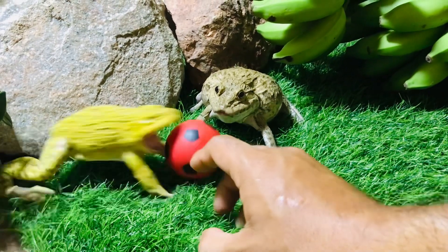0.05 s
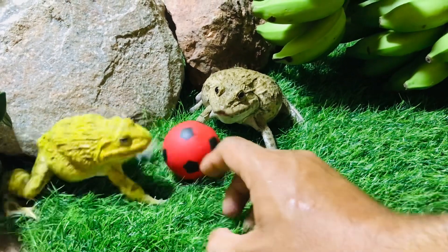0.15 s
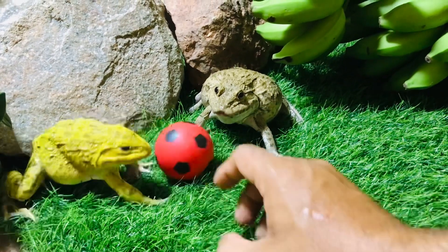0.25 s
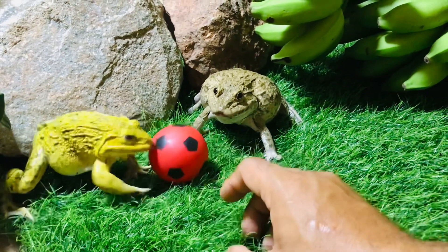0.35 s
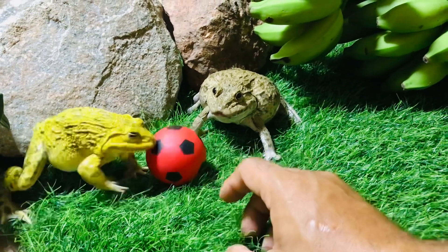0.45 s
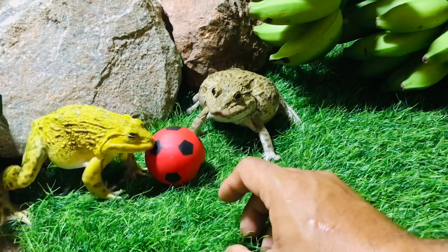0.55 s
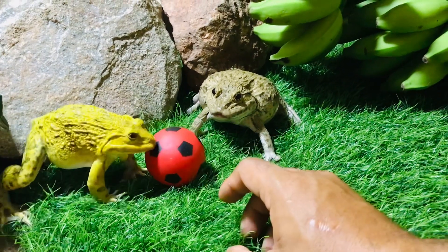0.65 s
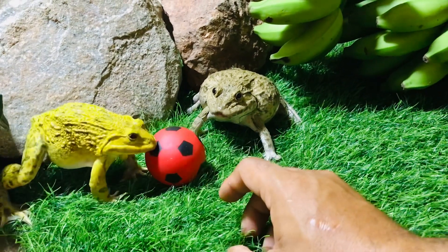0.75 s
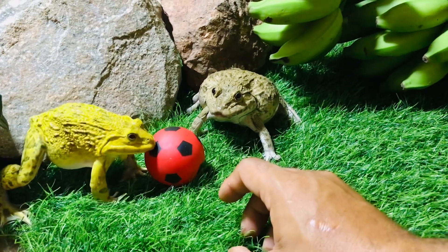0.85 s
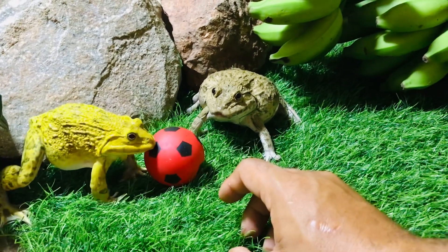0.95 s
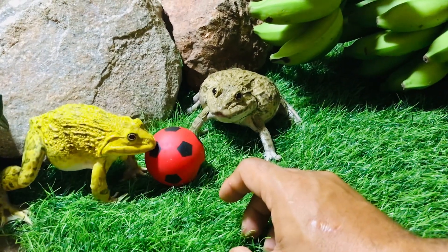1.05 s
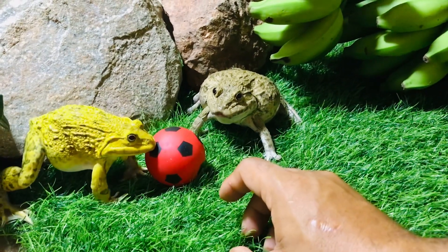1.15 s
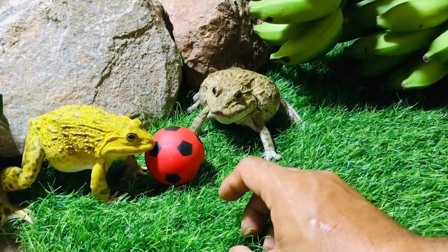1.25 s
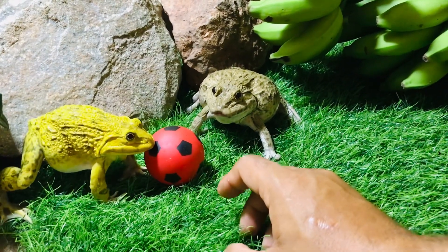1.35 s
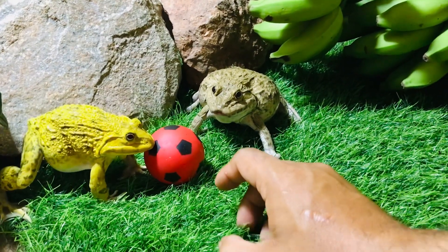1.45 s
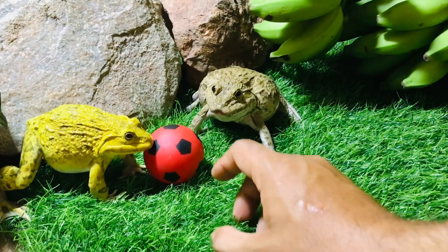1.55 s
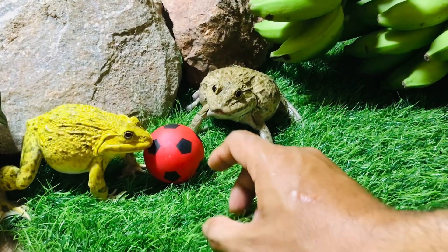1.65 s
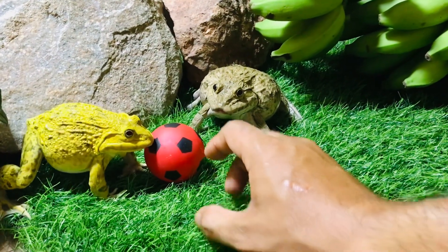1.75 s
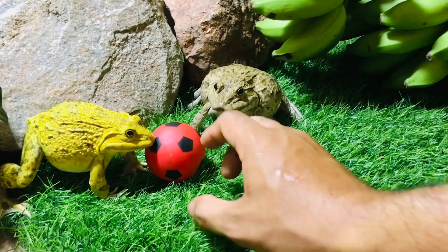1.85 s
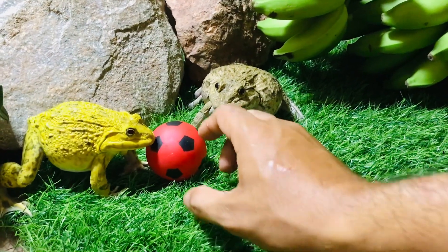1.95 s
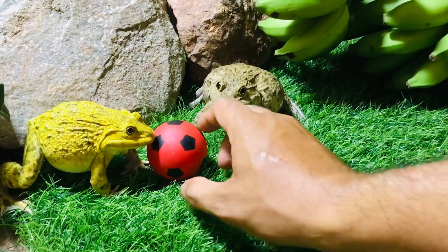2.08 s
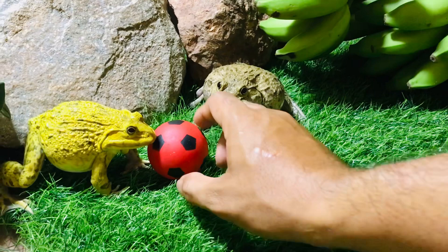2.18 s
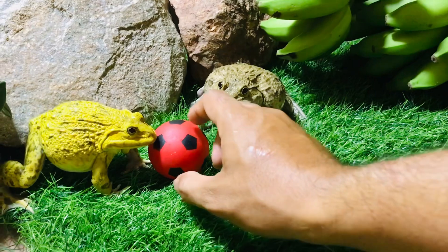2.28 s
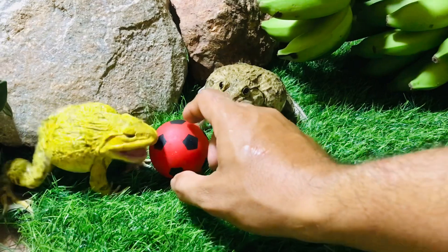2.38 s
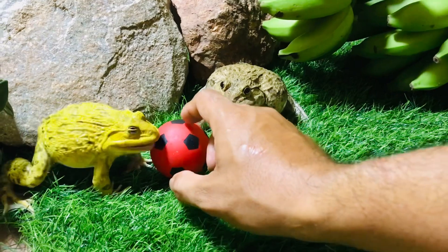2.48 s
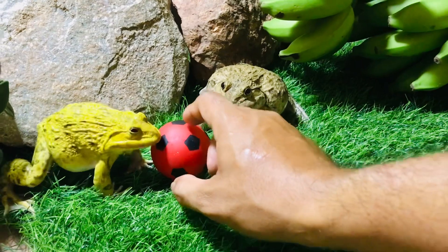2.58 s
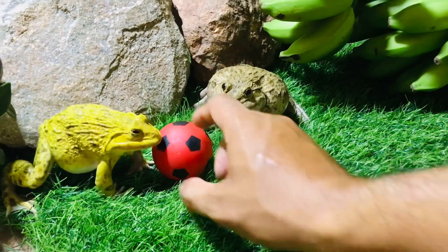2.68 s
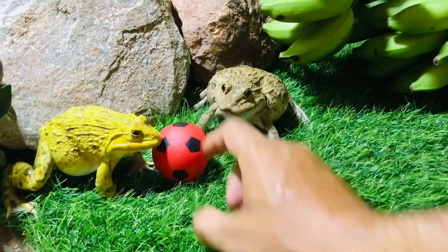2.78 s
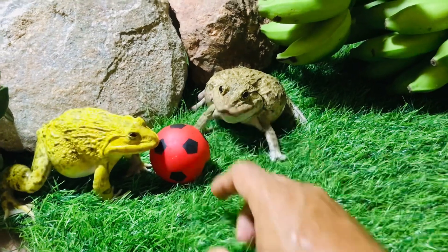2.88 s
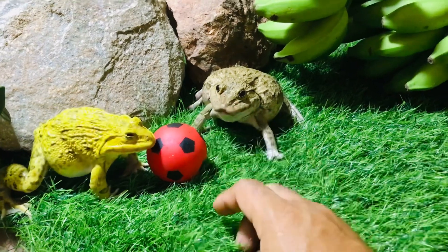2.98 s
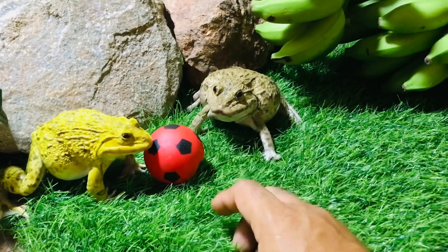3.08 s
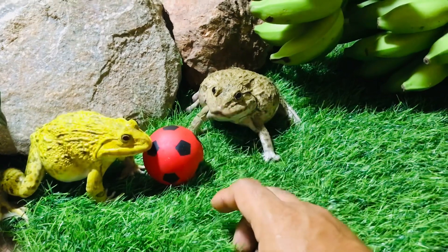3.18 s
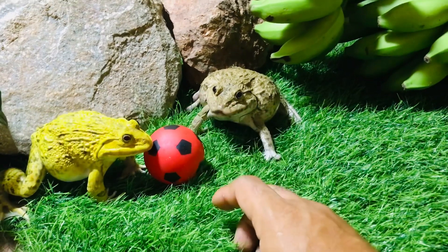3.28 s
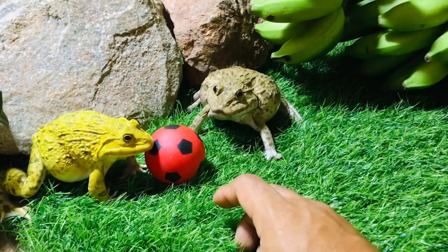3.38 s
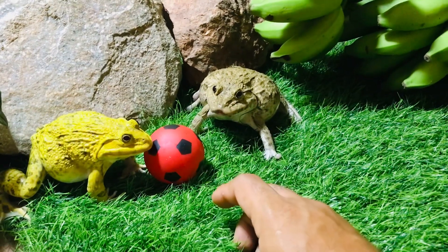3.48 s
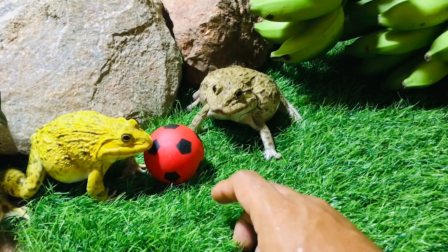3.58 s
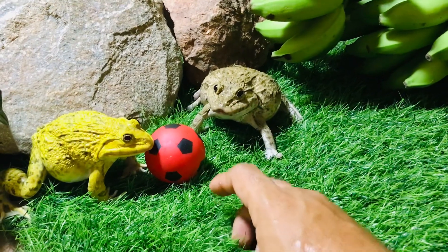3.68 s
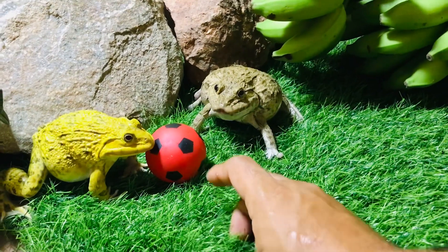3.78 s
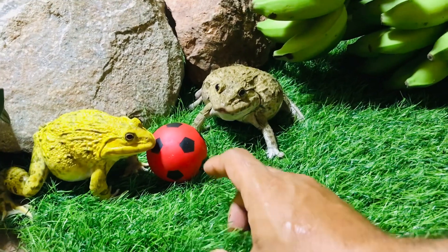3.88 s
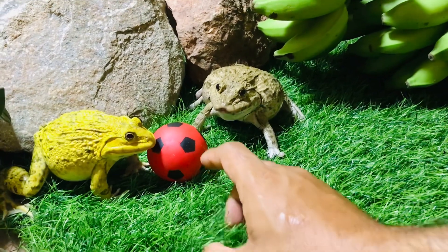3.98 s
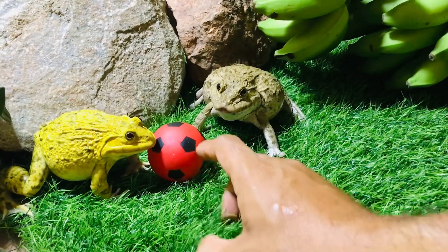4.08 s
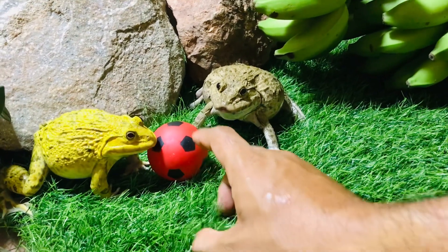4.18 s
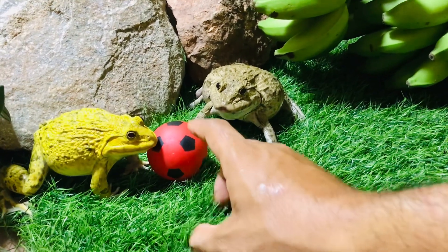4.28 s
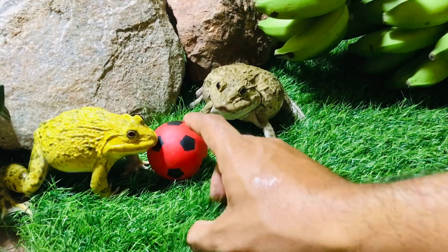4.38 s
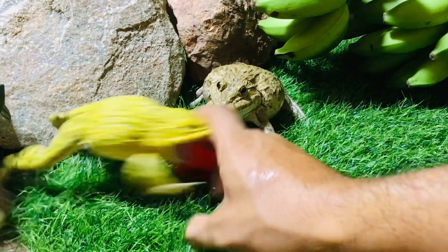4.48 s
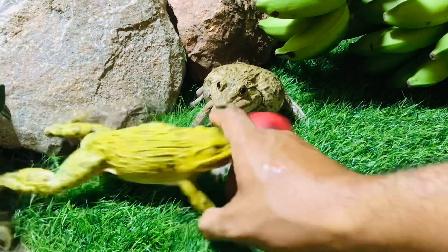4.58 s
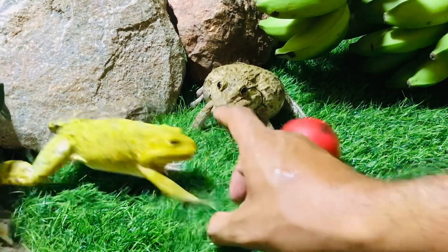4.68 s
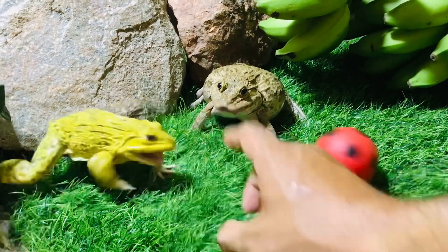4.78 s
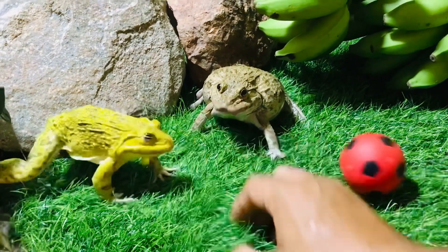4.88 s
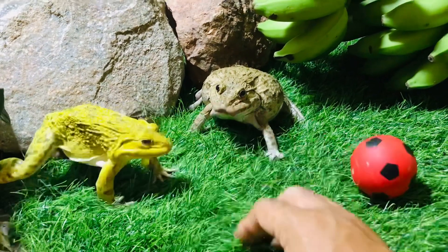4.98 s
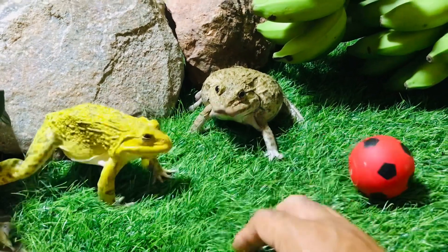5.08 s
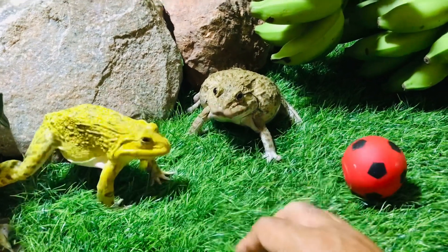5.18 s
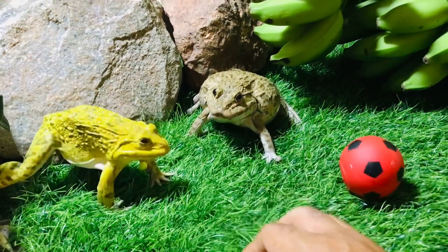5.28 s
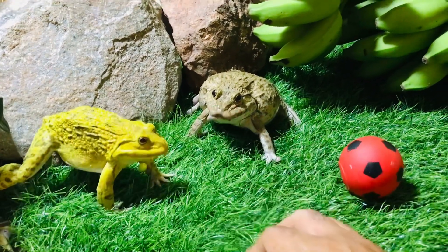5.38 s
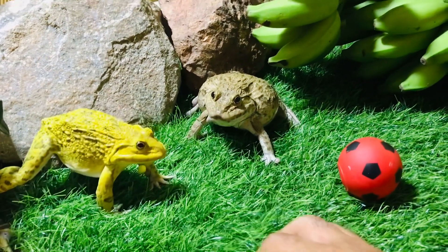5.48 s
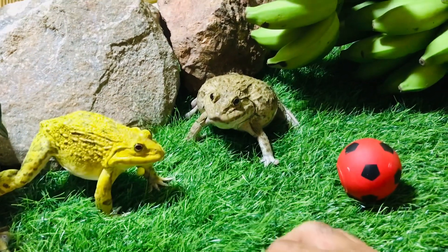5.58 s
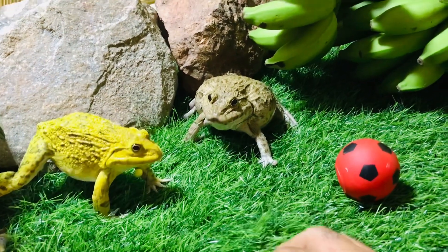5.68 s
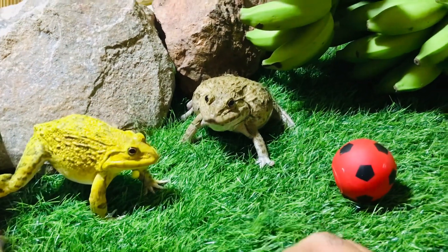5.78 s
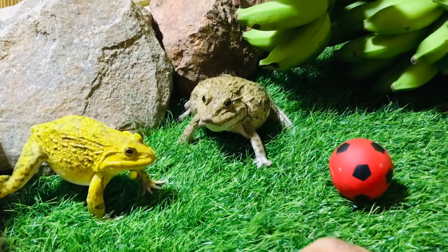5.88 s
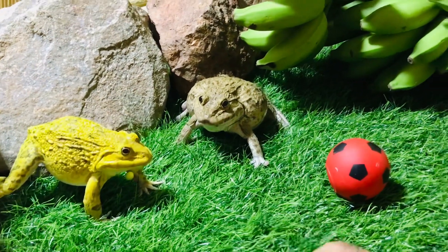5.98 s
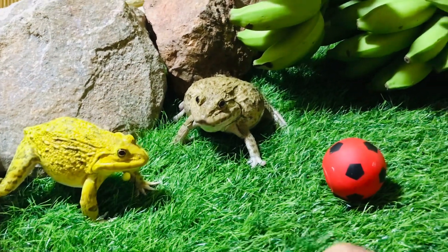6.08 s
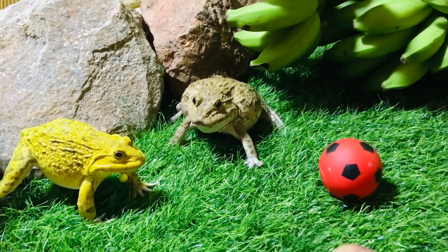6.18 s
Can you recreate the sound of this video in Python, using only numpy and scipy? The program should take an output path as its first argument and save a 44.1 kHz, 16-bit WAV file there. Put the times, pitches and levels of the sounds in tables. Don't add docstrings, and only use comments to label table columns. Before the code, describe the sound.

At 0 s the echo of a squeak already finished fades away within half a second, leaving a low machine drone at two deep pitches, a far rumble and a steady soft outdoor hiss; the hum swells and eases unevenly throughout. At about 2.35 s a small rubber squeaker close to the phone gives a bright, loud, high squeak lasting roughly 0.12 s, arching up then down, with a breathy puff at its opening and a rough splutter as it chokes. Its tail rings off hard walls for half a second. Background alone follows. Very faint grass rustling begins near 4.25 s, then a slightly duller squeak at 4.46 s with a sharper opening whistle, a brief rubber scrape near 4.7 s, and a last dull-starting squeak at 4.73 s, choking longer. The echo dies, and hum and hiss continue to the end, around 6 s.

```python
import sys
import numpy as np
from scipy import signal
from scipy.fft import rfft, irfft
from scipy.io import wavfile
from scipy.ndimage import uniform_filter1d, minimum_filter1d

SR = 44100
rng = np.random.default_rng(int(sys.argv[2]) if len(sys.argv) > 2 else 0)


def generate_wav(signal):
    frames = np.transpose(np.atleast_2d(signal))
    scaled = np.clip(frames, -1, 1) * 32767
    pcm = np.round(scaled).astype(np.int16)
    wavfile.write(sys.argv[1], SR, pcm)


def gain_from_decibels(decibels):
    exponent = np.asarray(decibels, float) / 20
    return 10 ** exponent


N = 275357
LEAD = SR // 4


def shaped(points, count, bands=()):
    hz, db = np.transpose(points)
    bins = np.arange(count // 2 + 1) * SR / count + 1
    colour_db = np.interp(np.log(bins), np.log(hz), db)
    for centre, width, lift_db in bands:
        colour_db += lift_db * np.exp(-((bins - centre) / width) ** 2)
    noise = irfft(rfft(rng.standard_normal(count)) * gain_from_decibels(colour_db), count)
    return noise / noise.std()


def band(hz, width_hz, count, order=1):
    bins = np.arange(count // 2 + 1) * SR / count
    bell = 1 / (1 + (2 * (bins - hz) / width_hz) ** 2) ** order
    noise = irfft(rfft(rng.standard_normal(count)) * bell, count)
    return noise / noise.std()


def add(track, sound, s):
    i = int(s * SR) + LEAD
    track[i:i + len(sound)] += sound


def reed_roughness(t, start, end):
    starting = 0.18 * np.exp((start - t) / 0.015)
    choking = 0.47 * np.exp((t - end) / 0.016)
    return np.clip(0.028 + starting + choking, 0, 1)


def squeak(rows, grip, body, shell, jitter=0.04, breath_db=-19, edge_s=0.002):
    s, hz, level_db, bright_db = np.transpose(rows)
    t = np.arange(s[0], s[-1], 1 / SR)
    level_db = np.interp(t, s, level_db)
    bright_db = np.interp(t, s, bright_db)
    rough = reed_roughness(t, s[0], s[-1])

    arch = uniform_filter1d(np.interp(t, s, hz), size=300, mode="nearest")
    arch = uniform_filter1d(arch, size=250, mode="nearest")
    wavering = 1 + jitter * rough * band(0, 600, len(t), order=2)
    phase = 2 * np.pi * np.cumsum(arch * wavering) / SR

    partials_db = []
    for k, grip_db in enumerate((grip[0], 0, grip[1]), 1):
        partials_db.append(level_db + np.interp(k * arch, *np.transpose(body)) + grip_db)
    for k in range(4, 12):
        partials_db.append(level_db + bright_db + np.interp(k * arch, *np.transpose(shell)))
    partials_db[3] = (partials_db[3] + partials_db[2] - 7.0) / 2

    tone = 0
    for k, db in enumerate(partials_db, 1):
        flutter_db = (0.62 * k + 5 * rough) * band(35, 75, len(t), order=2)
        tone = tone + gain_from_decibels(db + flutter_db) * np.sin(k * phase)
    leak = gain_from_decibels(breath_db + level_db) * rough ** 0.57 * band(6900, 9400, len(t), order=2) * (1 + np.cos(phase))
    edges = np.clip(np.minimum(t - s[0], s[-1] - t) / edge_s, 0, 1)
    return edges * (tone + leak)


# time in seconds, pitch in Hz, level in dB, brightness of the upper partials in dB.
SQUEAKS = [
    [(-.17, 1407, -21, -12), (-.14, 1700, -8, -14), (-.06, 1745, -7.5, -15), (-.03, 1656, -18.5, -23),
     (-.008, 1375, -22, -16)],
    [(2.347, 1387, -24.5, -26), (2.357, 1558, -9, -19), (2.365, 1614, -4.5, -17), (2.383, 1862, -9.5, -9),
     (2.399, 1893, -8, -10.5), (2.425, 1876, -7, -12.5), (2.447, 1708, -10, -6), (2.456, 1638, -12.5, -6.5),
     (2.468, 1533, -30, -21)],
    [(4.46, 1597, -13.5, -15), (4.469, 1541, -5.5, -25.5), (4.481, 1614, -5, -23), (4.495, 1728, -6, -19.5),
     (4.518, 1822, -8.5, -19.5), (4.541, 1754, -10, -15), (4.563, 1643, -14, -11), (4.58, 1568, -16, -16)],
    [(4.733, 1474, -22, -36), (4.741, 1521, -8, -30), (4.755, 1680, -8, -28.5), (4.786, 1808, -8.5, -21),
     (4.809, 1714, -9, -11), (4.831, 1524, -17, -15), (4.843, 1450, -29, -16)],
]
# first partial in dB, third partial in dB.
GRIP = [(-1, 1.5), (0.3, 0.2), (0.8, -2), (-1, 2)]
# Hz, level in dB.
BODY = [(1450, -9.5), (1700, -10), (1900, -5), (3250, 1), (3800, 0), (4600, 3.5), (5100, -8.5),
        (5700, -3.5)]
BODY_TURNED = [(1450, -11.5), (1700, -4.5), (1900, -6), (3200, 1.5), (3650, -0.5), (4500, -5), (5100, -7.5),
               (5700, -9.5)]
# Hz, level in dB.
SHELL = [(5500, 18), (6200, -13), (7000, 6), (7600, -8), (8300, -8), (9200, -2), (10300, -10.5),
         (11200, -2.5), (12200, -11), (13200, -12), (14200, -22), (15000, -20), (15800, -30), (16500, -23)]
SHELL_TURNED = [(5500, 11), (6300, 1.5), (7000, 2.5), (7900, -4), (8500, -1.5), (9000, 1), (9500, -4),
                (10100, -5), (10700, -9.5), (11400, -10.5), (12400, -4.5), (13300, -12), (14300, -16),
                (15800, -19)]


def squeaker(track):
    facing, turned = (BODY, SHELL), (BODY_TURNED, SHELL_TURNED)
    for rows, grip, colour in zip(SQUEAKS, GRIP, (turned, facing, turned, turned)):
        add(track, squeak(rows, grip, *colour), rows[0][0])


def puff(length_s, db, hz, width_hz, grain_db=3):
    count = int(length_s * SR)
    grain = gain_from_decibels(db + grain_db * band(0, 400, count))
    swell = np.hanning(count) ** 0.36
    return grain * swell * band(hz, width_hz, count, order=2)


# opening level in dB, opening whistle level in dB,
# whistle pitch in Hz, choke level in dB, choke length in seconds.
ENDS = [
    (-25.5, -31, 3600, -30.5, .02),
    (-25, -17, 3600, -28, .012),
    (-31, -22, 2940, -29, .034),
]
# centre in Hz, width in Hz, level in dB.
CHOKE = [(6030, 9000, 2.3), (3310, 1530, -0.5), (1190, 410, -10.5), (680, 500, -17.5)]


def air_at_ends(track):
    for rows, (open_db, whistle_db, whistle_hz, choke_db, choke_s) in zip(SQUEAKS[1:], ENDS):
        start, end = rows[0][0], rows[-1][0]
        add(track, puff(0.0095, open_db, 2050, 3000), start - 0.006)
        add(track, puff(0.008, whistle_db, whistle_hz, 500), start - 0.0025)
        for hz, width_hz, db in CHOKE:
            add(track, puff(choke_s, choke_db + db, hz, width_hz), end - 0.5 * choke_s)


# start in seconds, length in seconds, level in dB, centre in Hz, width in Hz.
PUFFS = [(2.342, .011, -36, 900, 1000), (2.454, .009, -30, 9500, 200), (2.454, 0.011, -24, 11100, 200),
         (4.466, 0.016, -25, 11000, 220), (4.25, 0.21, -59.5, 10700, 2700), (4.33, 0.23, -50, 10600, 7300),
         (4.453, .013, -32, 1017, 180), (4.689, 0.06, -34.5, 1850, 1100), (4.686, 0.063, -41, 1140, 300),
         (4.683, .08, -38, 640, 500), (4.84, .032, -34.5, 655, 380)]


def chirps_and_brushes(track):
    for s, *shape in PUFFS:
        add(track, puff(*shape), s)


# delay in seconds, level in dB.
WALL_ECHOES = [(.0011, -22.5), (.0047, -18), (0.014, -37)]
# Hz, time to fall 60 dB in seconds, level in dB.
ROOM = [(1000, 0.66, -28), (1790, 0.88, -23.5), (3020, 0.6, -22.5), (3800, 0.69, -24.5), (5400, 0.43, -26),
        (7330, 0.85, -18.5), (9900, 0.34, -26), (13900, 0.35, -23)]


def room():
    t = np.arange(SR) / SR
    hz, t60, db = np.transpose(ROOM)
    response = np.zeros(SR)
    for f in 400 * 2 ** np.arange(0, 5.4, .5):
        decay = np.interp(f, hz, t60)
        size = np.sqrt(f / SR / decay / SR) * gain_from_decibels(np.interp(f, hz, db) + 20.5)
        near_fade = gain_from_decibels(3.0 - 60 * t / (0.32 * decay))
        far_fade = gain_from_decibels(-2 - 60 * t / (1.19 * decay))
        response += size * band(f, f / 3, SR) * (far_fade + near_fade)
    response *= np.clip(t / 0.0024, 0, 1)
    for delay, echo_db in WALL_ECHOES:
        response[int(delay * SR)] += gain_from_decibels(echo_db)
    return response


# time in seconds, load in dB.
HUM = [(0.0, -43.5), (0.35, -44.5), (0.5, -36), (0.54, -42), (2.05, -39), (2.62, -50), (2.71, -38.5),
       (3.01, -37.5), (3.02, -49), (3.44, -44.5), (3.72, -35), (3.75, -44), (4.76, -49), (5.32, -38),
       (5.39, -51), (5.61, -41), (6.17, -47.5), (6.24, -52)]


def machine_load():
    return np.interp(np.arange(N) / SR, *np.transpose(HUM))


def drones(load_db):
    out = np.zeros(N)
    for hz, width_hz, db, waver_db in ((58.2, 20, -0.5, 2), (103.5, 2.2, -5, 1.5)):
        drone = band(hz, width_hz, N)
        drone = drone / (0.38 + np.sqrt(uniform_filter1d(drone ** 2, size=3000)))
        out += gain_from_decibels(load_db + db + waver_db * band(0, 3.9, N)) * drone / drone.std()
    return out


# Hz, level in dB per Hz.
RUMBLE = [(55, -59), (75, 4), (90, -19), (130, -5), (204, -7), (231, -10), (297, -4), (420, -17),
          (550, -78)]


def rumble(load_db):
    return shaped(RUMBLE, N) * gain_from_decibels(-47.5 + 0.39 * (load_db - load_db.mean()))


# Hz, level in dB per Hz.
HISS = [(220, -16), (380, -10.5), (535, -4.5), (742, -2), (1050, -6.5), (1110, -6), (1690, -7.5),
        (2310, -9.5), (3010, -11), (4520, -16), (4880, -18.5), (5980, -21), (7790, -24), (11700, -25.5),
        (15700, -41)]
# centre in Hz, width in Hz, lift in dB.
HISS_BANDS = [(817, 94, 3), (1680, 146, 3), (2980, 180, 2.5), (4860, 240, -4.5), (7680, 310, -4.5),
              (10530, 190, -6)]


def outdoor_hiss():
    return shaped(HISS, N, HISS_BANDS) * gain_from_decibels(-45 + 0.33 * band(0, 5.4, N))


def scene():
    near = np.zeros(N + LEAD)
    squeaker(near)
    air_at_ends(near)
    chirps_and_brushes(near)
    echo = signal.fftconvolve(near, room())[LEAD:LEAD + N]
    near = near[LEAD:]

    load_db = machine_load()
    background = drones(load_db) + rumble(load_db) + outdoor_hiss()

    quick = uniform_filter1d(np.abs(near), size=700)
    slow = uniform_filter1d(np.abs(near + echo), size=2000)
    echo_held = echo / (1 + quick / 0.11) ** 0.28
    background_held = background / (1 + slow / 0.0063) ** 0.18
    return (near + echo_held + background_held)[None]


def roll_off(x):
    return signal.sosfilt(signal.butter(12, 15850, fs=SR, output="sos"), x)


def record(dry):
    mix = signal.sosfilt(signal.butter(2, 36, "high", fs=SR, output="sos"), dry)
    gain = minimum_filter1d(np.minimum(1, 0.985 / (np.abs(mix) + 1e-9)), size=441)
    mix = mix * uniform_filter1d(gain, size=221)
    mix = signal.sosfiltfilt(signal.ellip(8, .1, 60, 15800, fs=SR, output="sos"), mix)
    return roll_off(mix)


dry = scene()
out = record(dry)
generate_wav(out)
```